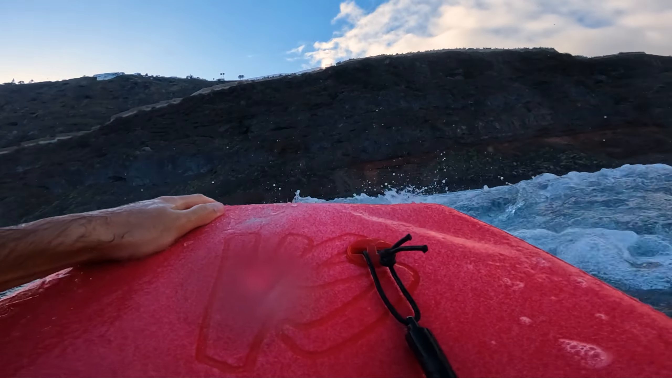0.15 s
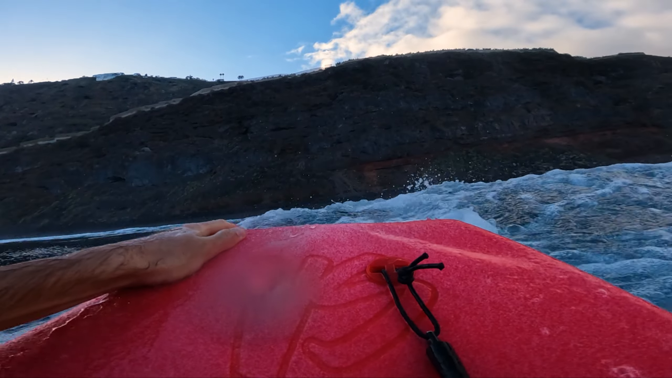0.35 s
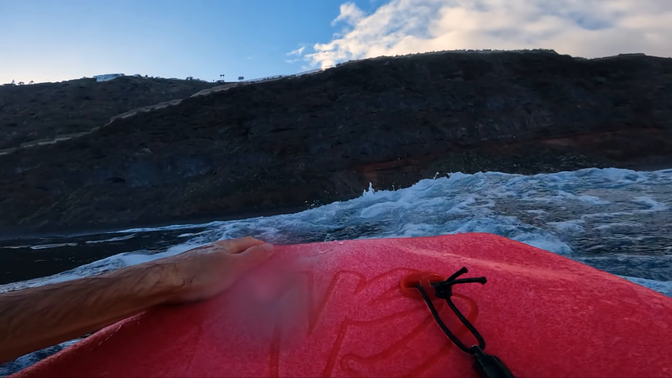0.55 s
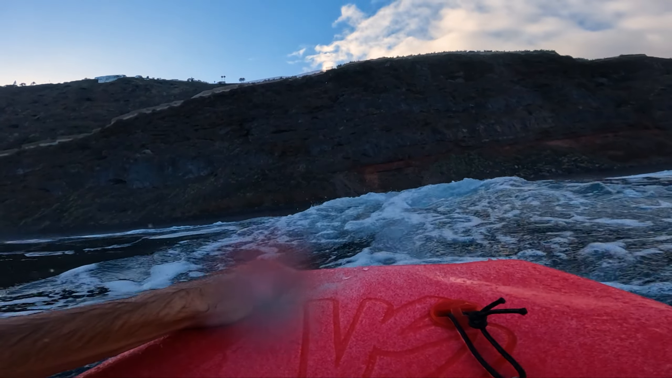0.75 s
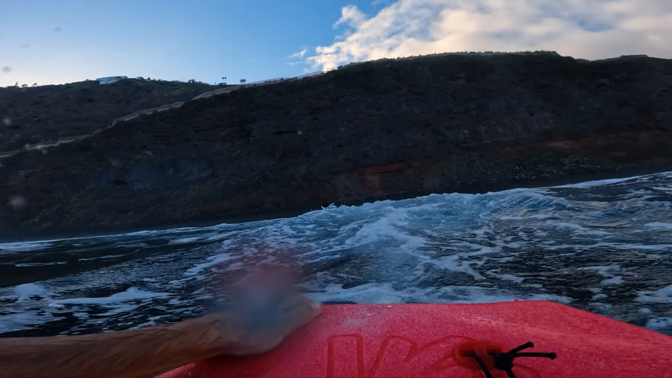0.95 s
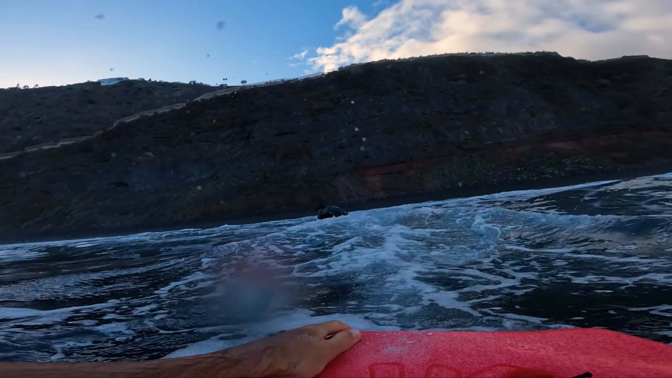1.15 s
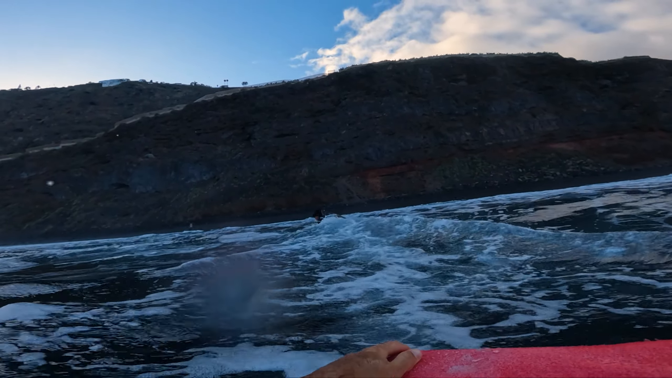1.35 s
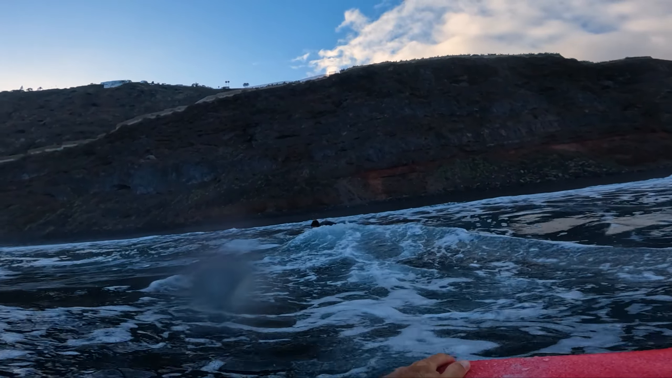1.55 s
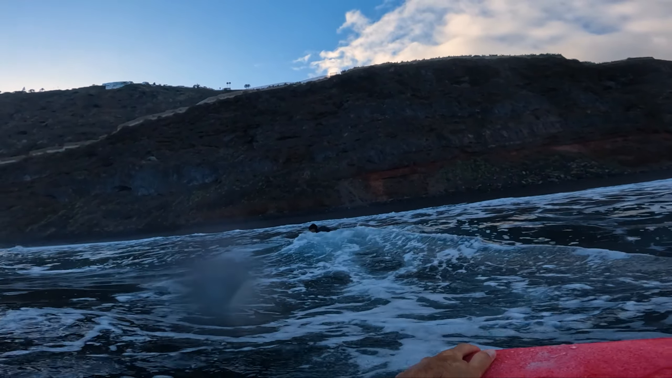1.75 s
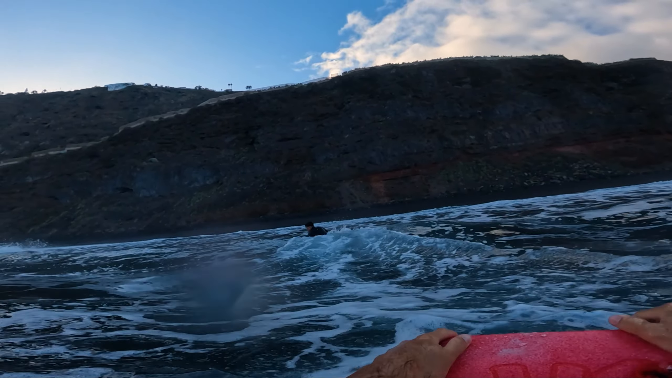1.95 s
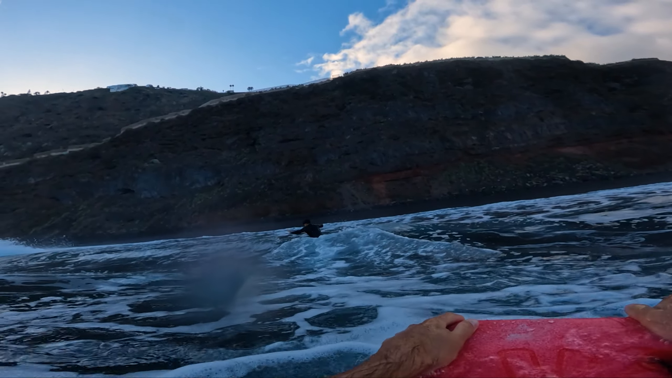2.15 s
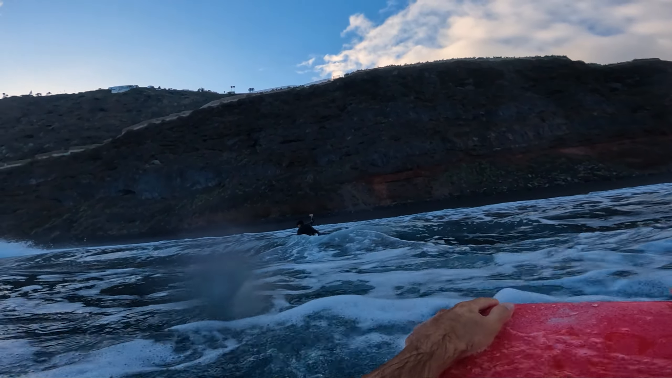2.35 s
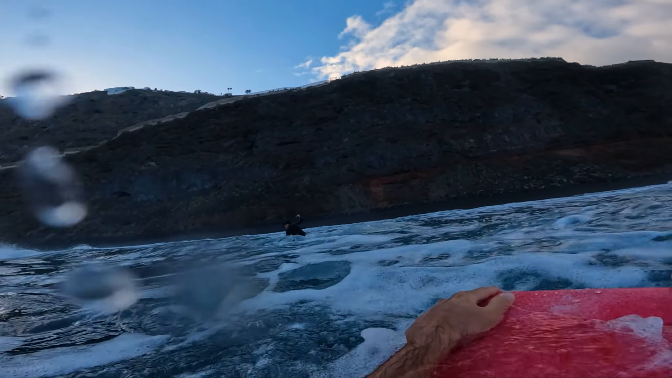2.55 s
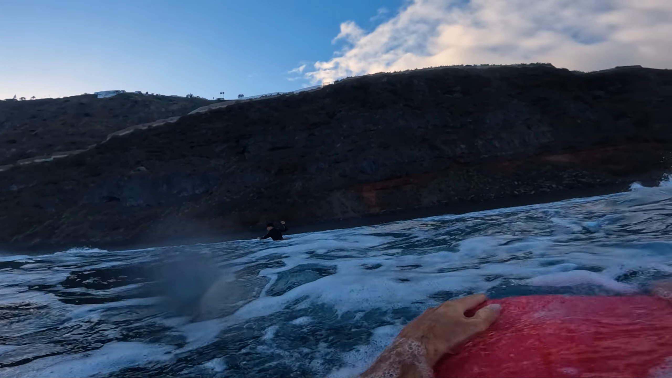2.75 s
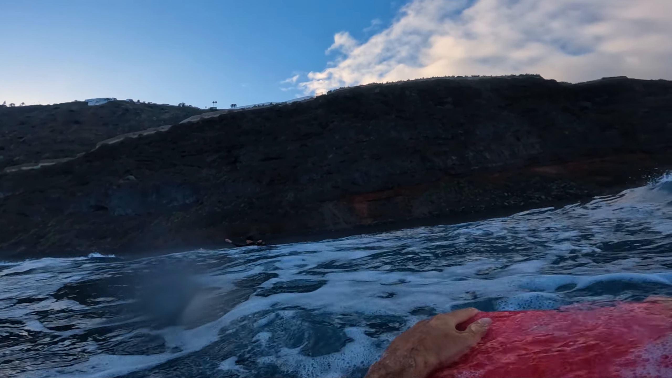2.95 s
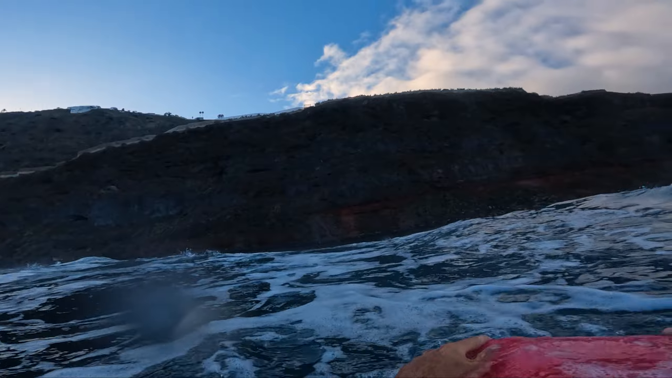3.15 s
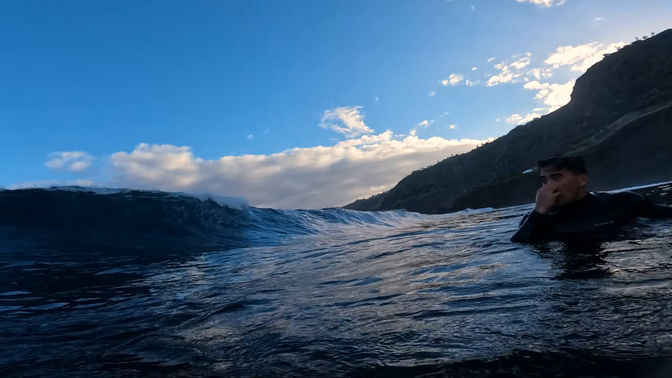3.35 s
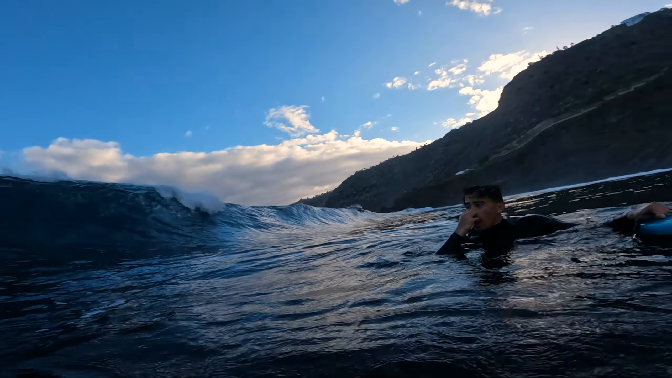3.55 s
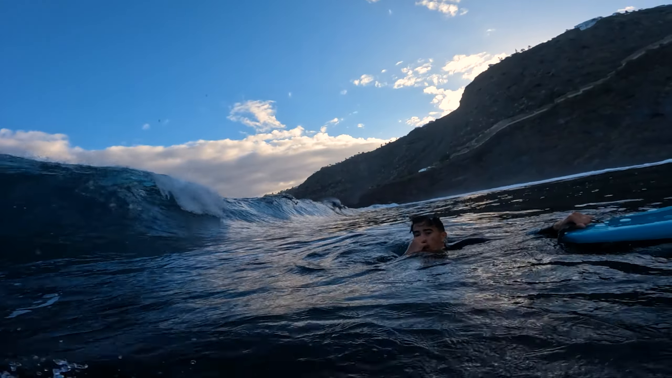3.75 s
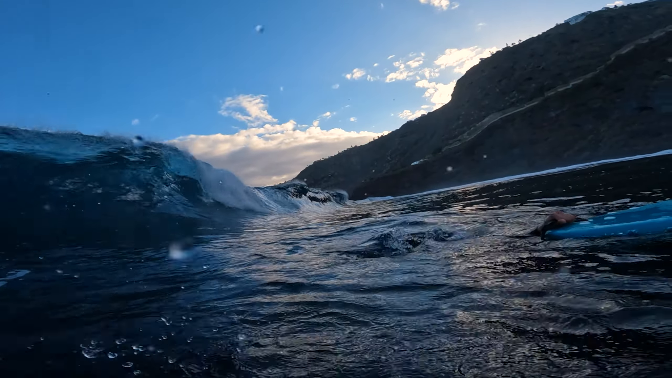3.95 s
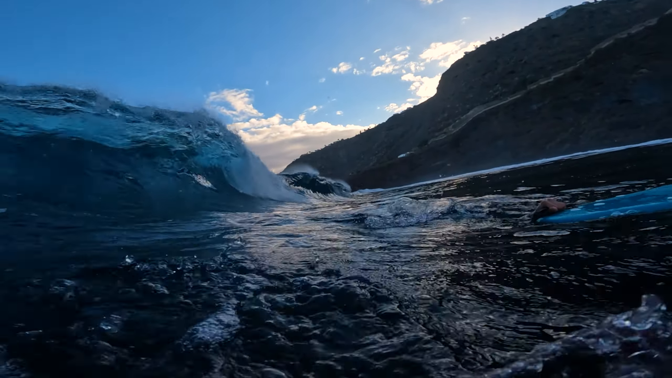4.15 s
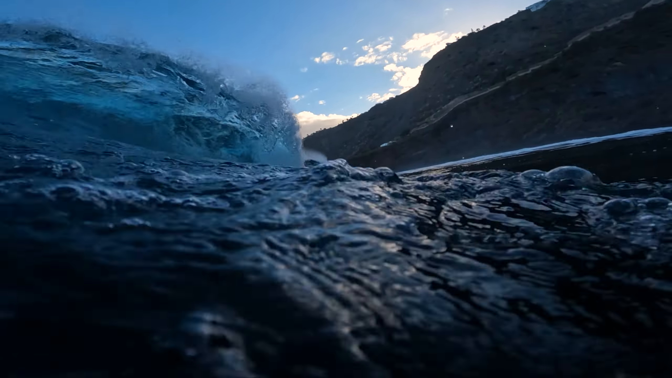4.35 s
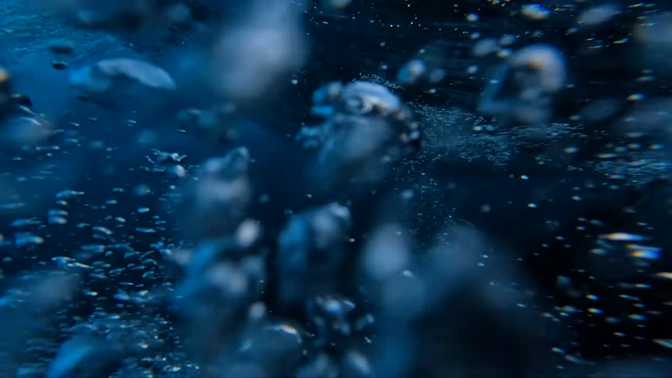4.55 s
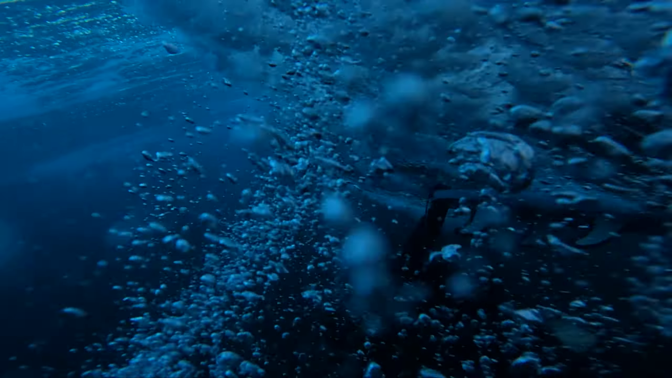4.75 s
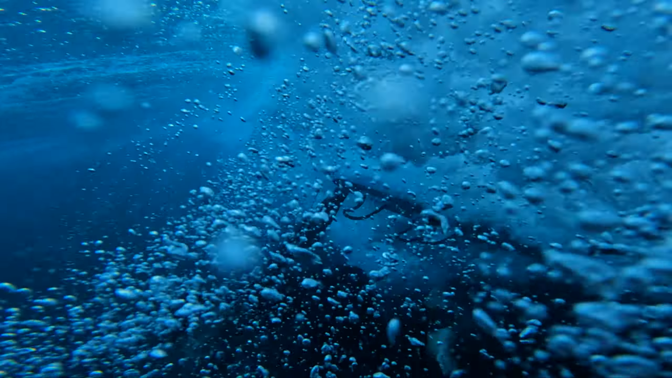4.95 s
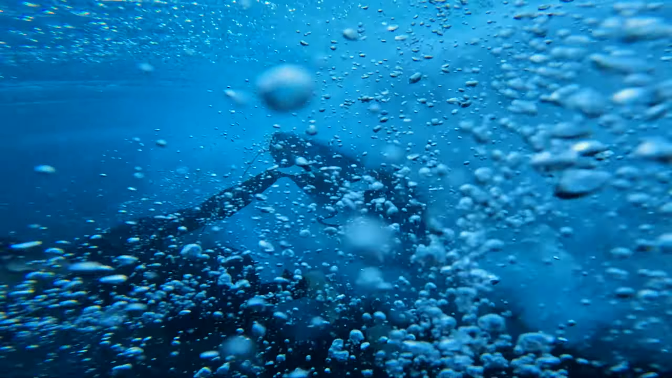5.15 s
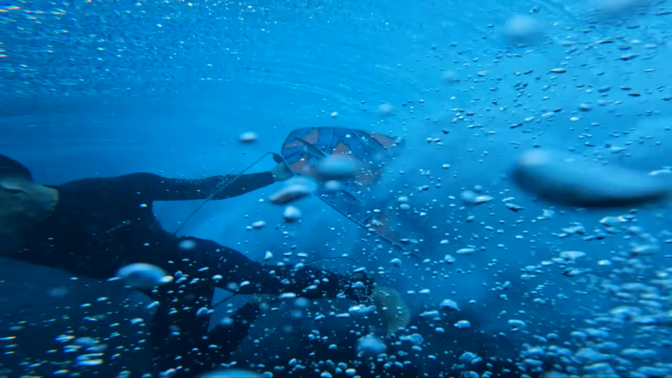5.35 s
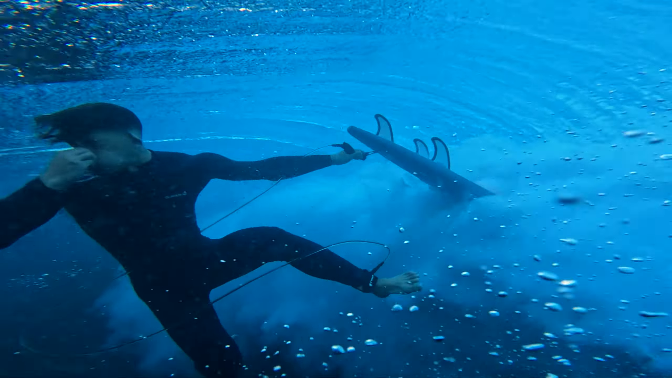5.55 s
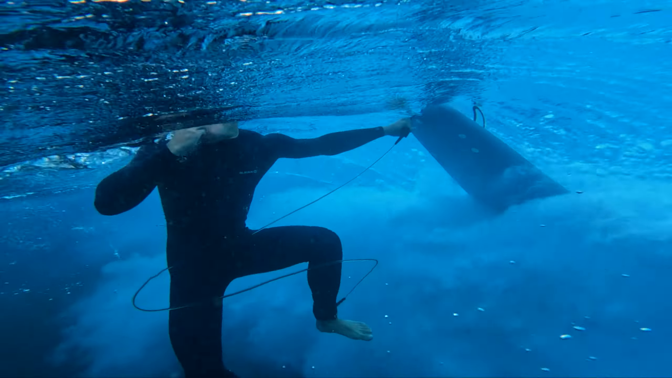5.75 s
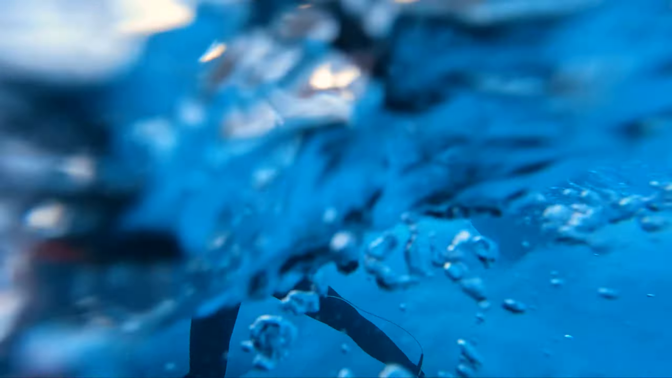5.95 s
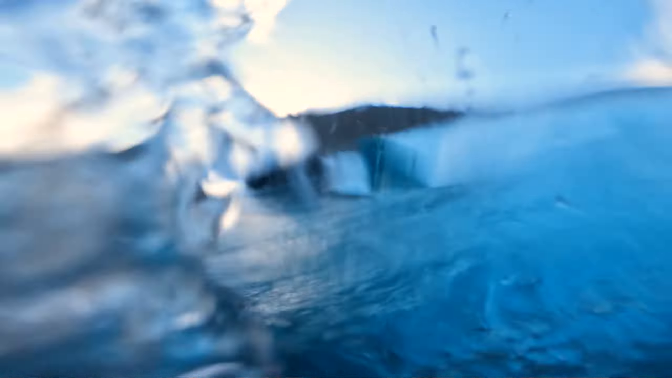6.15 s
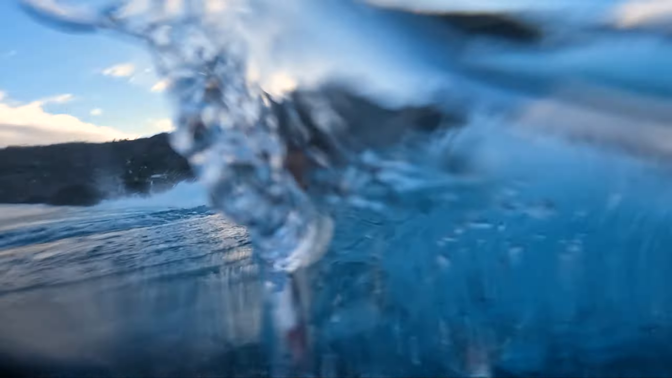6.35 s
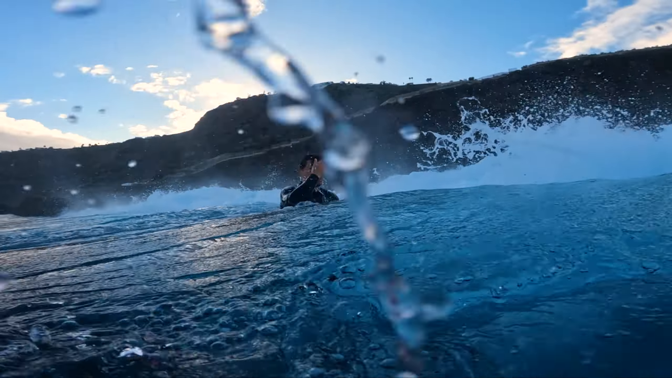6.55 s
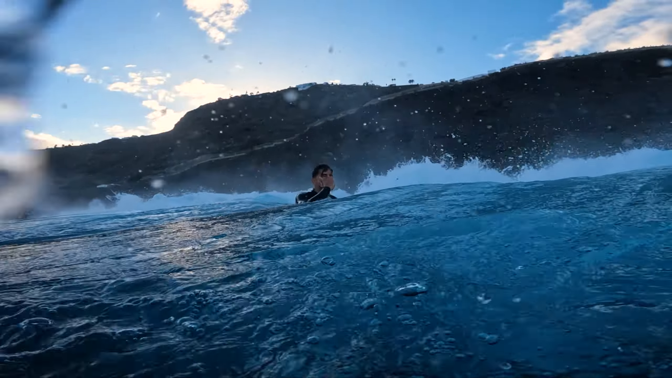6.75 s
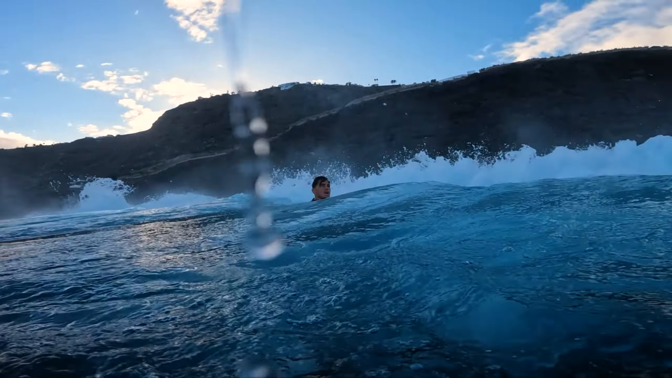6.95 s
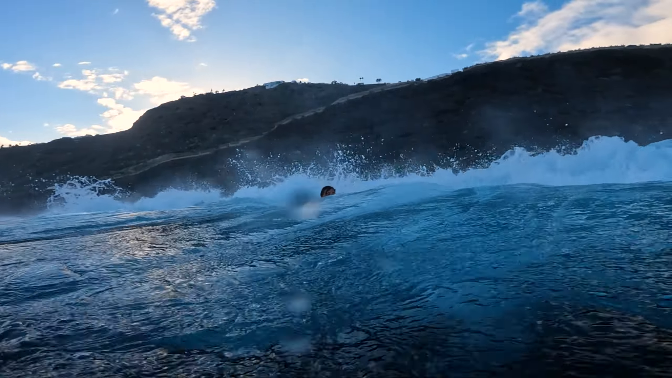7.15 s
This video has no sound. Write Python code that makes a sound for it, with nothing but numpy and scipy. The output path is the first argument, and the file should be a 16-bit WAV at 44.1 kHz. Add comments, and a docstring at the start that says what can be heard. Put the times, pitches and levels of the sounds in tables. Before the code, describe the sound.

Close, water-clogged microphone in the sea: dull rushing, an abrupt join, wet plops, a loud splashing dunk, deep bubbles and gulps, then calmer sloshing.

```python
"""In the surf, on a board: a small camera hears it all close up, its one microphone port filmed with water.
White water rushes past as coloured noise, low and muffled. A hard splice snaps to a second shot:
the foam swells, pops and slaps strike the port, and the camera dips under among bubbles (dying sines)
and gurgles (unsteady gliding tones), with spray as dense tiny rings, then comes up into calmer water."""
import sys
import numpy as np
from scipy import signal
from scipy.io import wavfile
from scipy.ndimage import uniform_filter1d

SR = 44100
rng = np.random.default_rng(int(sys.argv[2]) if len(sys.argv) > 2 else 0)


def output_pcm(signal):
    """Save a mono or channel-first signal as 16-bit PCM at the path in sys.argv[1].

    Samples are clipped to [-1, 1] before scaling.
    """
    pcm = np.clip(np.atleast_2d(signal).T, -1, 1) * 32767
    wavfile.write(sys.argv[1], SR, np.round(pcm).astype(np.int16))


def volts(x):
    """Linear amplitude factor 10**(x/20) for a level x in dB, scalar or array-like."""
    e = np.asarray(x, float) / 20
    return 10 ** e


N = 321930

# Where the camera is. Each row: time in seconds, share under water 0-1, brokenness of the flow 0-1,
# pitch of the wet port as a factor, brightness of the foam as a factor.
PLACE = [(0, 0, 0.14, 1, 1.1), (.8, 0.033, 0.035, 0.99, 1.12), (1.7, .06, 0.12, 0.96, 1.03),
         (2.0, 0.17, 0, 0.95, 1.115), (3.298, 0, 0.04, 1.03, 0.85), (3.338, 0.054, 0.63, 1.15, 0.72),
         (3.601, 0.12, 0.14, 1.08, 1.1), (3.951, .05, 0.25, 1.27, 1.17), (4.458, 0.08, 0, 1.135, 0.88),
         (4.62, 0.33, 0.23, 0.88, 1.3), (4.72, 0.22, 0.84, 1.24, 1.3), (4.801, .1, 0.56, 1.4, 0.79),
         (4.999, 0.34, 0.4, 1.1, 1.2), (5.251, .67, 0.14, 1.04, .95), (5.501, 0.53, 0.089, 1.12, 1.1),
         (5.699, .27, 0.091, 1.03, 1.1), (5.951, 0.48, 0.36, .81, 0.96), (6.051, 0.65, 0.66, 1.17, 1.9),
         (6.171, 0.23, 0.3, 0.93, 1.4), (6.719, 0.21, 0, 0.99, 1.5), (6.919, .075, 0.2, 0.91, 1.15),
         (7.3, 0.099, 0, 1.05, 1.5)]
# Colours at the microphone above water, before blending. Each row: frequency in Hz, density in dB per Hz.
BUFFET_COLOUR = [(8, -18), (25, -2.5), (70, -2), (120, -6), (200, -16.5), (400, -61)]
SLOSH_COLOUR = [(40, -29.5), (90, -1), (140, -2.5), (300, -2), (420, -4.5), (700, -33.5), (1200, -68)]
PORT_COLOUR = [(200, -31), (380, -3), (665, -2.5), (705, -7), (930, -12), (1050, -16.5), (1120, -14.5),
               (1400, -20.5), (2000, -39), (4000, -76)]
FOAM_COLOUR = [(700, -32), (1000, -16), (1250, 1), (1700, -6), (2300, -8), (3300, -12.5), (4500, -19),
               (6500, -24.5), (10000, -73.5), (16000, -81.5)]
# Under water the slosh narrows, the port rings clear of it and the foam dulls.
# Each row: frequency in Hz, density in dB per Hz, before blending.
SLOSH_UNDER = [(40, -39), (100, -25.5), (145, 8.5), (310, -2.5), (400, -23), (600, -35.5), (1200, -69.5)]
PORT_UNDER = [(200, -35.5), (450, -6.5), (620, -1), (800, 8), (950, 0), (1200, -20), (1700, -40.5),
              (4000, -82)]
FOAM_UNDER = [(700, -24.5), (1300, 10), (1800, 3), (2500, -12.5), (4000, -34), (6500, -54), (10000, -70),
              (16000, -87)]
# The three low layers. Each row: time in seconds, buffeting in dB, slosh in dB, ring of the wet port in dB.
FLOW = [(0, -35.5, -29, -35.5), (.32, -26.5, -31.5, -32), (.55, -23.5, -28, -29.5), (1.04, -21.5, -23, -26),
        (1.51, -23, -25, -30), (1.81, -26.5, -21, -22.5), (2.88, -24.5, -19, -30), (3.318, -29, -21, -25.5),
        (3.33, -43, -53, -38.5), (3.355, -42, -36, -34), (3.38, -55, -31, -41), (3.45, -33, -36.5, -44),
        (3.49, -33.5, -41, -33), (3.53, -31, -34, -31.5), (3.65, -37.5, -33, -28.5),
        (3.76, -32.5, -32.5, -32), (3.97, -43.5, -27.5, -33), (4.02, -27.5, -29, -30),
        (4.47, -31, -23.5, -25), (4.51, -22, -25, -41), (4.557, -17.5, -18, -19), (4.65, -24.5, -20, -22),
        (4.81, -23.5, -17.5, -24.5), (5.0, -23.5, -28.5, -35), (5.08, -29, -24.5, -31.5),
        (5.16, -24, -27, -36), (5.27, -26, -23, -41.5), (5.43, -23.5, -20.5, -33),
        (5.46, -24.5, -23.5, -39.5), (5.7, -22.5, -25.5, -27), (5.78, -20.5, -33.5, -27),
        (6.02, -23, -25, -21), (6.07, -15, -28, -32.5), (6.19, -20, -29, -30.5), (6.24, -21, -32, -31),
        (6.32, -23, -27.5, -29), (6.46, -21, -25.5, -26.5), (6.62, -23, -33.5, -26.5),
        (6.655, -28, -27, -25.5), (6.72, -19.5, -24.5, -24.5), (6.83, -20.5, -20.5, -29.5),
        (6.88, -35, -33, -31.5), (7.03, -28.5, -27, -28.5), (7.3, -28, -24, -32)]
# The foam's hiss. Each row: time in seconds, level in dB.
HISS = [(0, -64.5), (.4, -65.5), (.7, -55), (.8, -61.5), (.88, -52), (1.15, -52), (1.25, -51.5),
        (1.36, -53.5), (1.58, -62), (1.68, -53.5), (1.99, -49.5), (2.26, -57.5), (2.82, -50), (3.01, -57.5),
        (3.318, -50), (3.33, -57), (3.47, -57), (3.52, -52.5), (3.88, -63), (4.18, -51), (4.48, -46),
        (4.548, -19), (4.57, -38), (4.96, -64.5), (5.03, -72.5), (5.12, -62), (5.5, -65.5), (5.62, -56.5),
        (5.81, -59.5), (5.84, -44), (5.86, -68), (5.95, -52), (6.01, -45), (6.1, -50), (6.21, -70),
        (6.32, -62.5), (6.52, -63), (6.63, -67.5), (6.7, -57), (6.78, -56.5), (6.85, -65.5), (7.3, -63)]
# Port and foam change level for a moment, mostly dips. Each row: middle in seconds, half length in seconds,
# change in dB.
LULLS = [(4.511, 0.0077, 0.5), (5.871, 0.012, -12.5), (6.233, 0.017, -8.5), (6.309, 0.0084, -7),
         (6.36, 0.014, -7.5), (6.404, 0.022, -7)]
# Air caught at the port sings and glides. Each row: start in seconds, length in seconds, level in dB,
# first pitch in Hz, last pitch in Hz.
GURGLES = [(4.498, 0.0043, -13, 1560, 1630), (4.55, 0.025, -8, 596, 484), (4.628, .055, -8.5, 167, 226.5),
           (4.685, .03, -18, 206.5, 170), (4.566, .035, -10.5, 430, 304), (4.66, 0.026, -8.5, 109, 119),
           (0.556, 0.063, -22, 549, 622), (4.739, 0.026, -54, 4260, 4220), (4.763, 0.035, -22.5, 870, 926),
           (5.941, 0.072, -17.5, 629, 597), (5.945, 0.012, -40, 1880, 1850),
           (5.981, 0.014, -23.5, 633, 684), (6.093, .012, -42, 1850, 1700), (5.609, 0.026, -40, 1036, 1390),
           (3.922, .03, -24, 585, 850), (4.799, .035, -19, 880, 780), (4.835, 0.023, -29.5, 1220, 1233),
           (4.867, 0.015, -17, 822, 730), (5.13, 0.026, -22.5, 632, 662), (5.178, 0.12, -32.5, 730, 860),
           (5.331, 0.069, -19, 295.8, 308.4), (5.441, 0.062, -22.5, 653, 646),
           (5.436, 0.0305, -20.5, 769, 738), (5.945, 0.012, -21.5, 1300, 1230),
           (5.979, 0.024, -12.5, 560, 588), (6.022, 0.011, -6.5, 524, 560), (6.155, .031, -49, 1670, 1935)]
# Water slapping the port. Each row: start in seconds, level at the front in dB,
# time to fall 60 dB in seconds (before limits).
SLAPS = [(0.7484, -50, .026), (0.765, -37.5, 0.041), (0.777, -38.5, 0.033), (1.1347, -37, 0.021),
         (1.2172, -32.5, 0.21), (1.2335, -38, 0.092), (1.262, -42, 0.17), (1.8297, -44, 0.016),
         (3.688, -42, 0.024), (4.496, -16, 0.0074), (4.513, -29.5, 0.027), (4.5219, -23, 0.039),
         (4.5297, -9.5, 0.012), (4.5399, -11.5, 0.025), (4.549, -19.5, 0.013), (4.681, -24, 0.0086),
         (4.709, -31, 0.024), (4.8798, -37, 0.018), (4.912, -45.5, .026), (5.1293, -53, 0.034),
         (5.575, -54, 0.012), (5.639, -48.5, 0.013), (5.732, -38.5, .02), (5.746, -43.5, 0.014),
         (5.7045, -39.5, .015), (5.83, -48, 0.019), (5.9434, -48.5, 0.024), (6.03, -44.5, 0.024),
         (6.075, -32.5, 0.033), (6.31, -46, 0.031), (6.338, -45, 0.027), (6.4455, -47, 0.025),
         (6.651, -47, 0.028)]
# Colour shared by the slaps. Each row: frequency in Hz, relative level in dB.
SLAP_COLOUR = [(500, -33), (1100, 4), (1600, 4), (2500, -6), (3600, -9.5), (4600, -22), (7000, -37.5),
               (12000, -62.5)]
# Single bubbles at the port, low gulps to small plinks. Each row: start in seconds, level in dB,
# starting pitch in Hz.
BUBBLES = [(2.003, -13.5, 613), (4.312, -24, 633), (0.767, -37, 2600), (0.767, -39, 1950),
           (0.778, -10.5, 542), (1.136, -32, 1930), (1.83, -36, 2100), (3.524, -13.5, 485),
           (3.673, -12, 350), (3.65, -18, 606), (3.69, -23, 1174), (3.912, -16, 600), (4.601, -7, 257),
           (4.622, -11.5, 648), (4.674, -8, 359), (4.681, -19, 1250), (4.709, -38, 2480),
           (4.754, -34.5, 2080), (4.777, -6.5, 443), (4.788, -30, 1760), (4.838, -44, 1720),
           (4.884, -26.5, 1253), (4.913, -33, 1840), (4.951, -10.5, 618), (4.956, -33, 1970),
           (4.981, -13, 703), (5.127, -29.5, 1740), (5.127, -47, 2680), (5.165, -45, 2020),
           (5.185, -16, 698), (5.27, -4.5, 146.3), (5.2964, -41.5, 1650), (5.358, -18, 183.7),
           (5.399, -1, 201), (5.541, -7.5, 560), (5.574, -12.5, 596), (5.578, -41, 1800),
           (5.638, -37, 1700), (5.625, -53, 3150), (5.711, -54, 3850), (5.6156, -21, 1185),
           (5.632, -16.5, 1010), (5.645, -14.5, 826), (5.7307, -37, 1350), (5.744, -11.5, 655),
           (5.785, -14, 682), (5.831, -4.5, 189.5), (5.8328, -36.5, 2030), (5.847, -6, 497),
           (5.878, -13, 570), (5.907, -11, 723), (5.944, -6, 571), (6.005, -6.5, 697), (6.025, -38, 2520),
           (6.048, -33, 2190), (6.061, -48, 3500), (6.073, -46, 3290), (6.113, -9, 91), (6.115, -7, 338.4),
           (6.194, 3, 98.3), (6.198, -6, 271), (6.281, 0, 92), (6.282, -4.5, 305), (6.333, -5.5, 479),
           (6.383, 1.5, 109), (6.388, -9.5, 426), (6.4304, -37, 1400), (6.444, -22.5, 1110),
           (6.449, -10.5, 582), (6.511, -11, 545), (6.498, -41.5, 1910), (6.514, -34.5, 1350),
           (6.537, -41, 1610), (6.6538, -40, 1830), (6.737, -12.5, 516), (6.824, -8, 548),
           (6.825, 1, 120.2)]
# A narrow fizz sinks through the foam as the board planes. Each row: time in seconds, level in dB, pitch in Hz.
FIZZ = [(.82, -71, 3290), (0.902, -66, 3350), (0.999, -55.5, 3100), (1.1, -62, 2850), (1.169, -73, 3040)]
# Spray crackling on the housing. Each row: time in seconds, level in dB.
SPRAY = [(1.19, -120), (1.23, -62), (1.36, -62), (1.45, -120), (4.49, -120), (4.535, -43.5), (4.57, -54),
         (4.72, -58.5), (4.8, -120), (5.49, -120), (5.52, -74), (5.66, -76), (5.72, -66), (5.84, -71),
         (5.868, -78.5), (5.96, -67), (6.04, -57.5), (6.11, -60), (6.19, -67), (6.21, -120)]
# The join of the two shots snaps twice. Each row: start in seconds, size of the downward step in dB,
# decay constant in seconds.
SNAPS = [(3.3182, -12, 0.0023), (3.325, -32.5, 0.000077)]
# The water film heaves on the membrane. Each row: time in seconds, level in dB, swing rate in Hz.
HEAVE = [(3.322, -25, 21), (3.398, -19, 12.6), (3.479, -23.5, 11.2), (3.56, -26, 19), (3.66, -31, 15.2),
         (3.71, -19.5, 8.6), (3.745, -19, 15), (3.771, -17.5, 13), (3.815, -18, 17), (3.84, -17, 10),
         (4.0, -21.5, 12), (4.07, -48, 13)]
# The film over the port bursts, a dry pop. Each row: start in seconds, gain in dB, pitch as a factor.
POPS = [(4.4945, -20, 1.25), (6.114, -28.5, .98), (6.138, -25.5, .98), (6.1565, -25.5, 0.99)]
# What a pop rings with at pitch factor 1. Each row: frequency in Hz, level in dB, time to fall 60 dB in seconds.
POP_MODES = [(1350, 11.5, 0.0059), (3300, -4, 0.0056)]
# Tiny bright ticks, some of them the crackle of an overloaded microphone.
# Each row: start in seconds, level in dB, pitch in Hz.
TICKS = [(4.499, -23, 4140), (4.5329, -17, 4110), (4.5504, -31, 4350), (4.581, -44, 3200),
         (4.593, -39, 3420), (4.624, -41, 3150), (4.649, -47, 3470), (4.659, -39, 3490), (4.666, -42, 3180),
         (4.684, -42, 3400), (4.713, -40, 3500), (4.721, -40.5, 3450), (4.738, -47, 4200),
         (4.835, -44.5, 4200), (4.880, -46.5, 4160), (4.915, -50, 2790), (5.6721, -47, 3620),
         (5.678, -52, 3600), (5.6828, -54, 3600), (5.7045, -44.5, 3240), (5.741, -52, 3510),
         (5.799, -54, 3430), (5.825, -50.5, 3300), (5.884, -53.5, 2940), (6.007, -46, 4140),
         (6.105, -45, 4180), (6.199, -50, 2600), (6.826, -50, 2990)]

SWARM_FROM = 0.2  # share under water at which random bubbles begin
RING_S, RING_SLOPE = 0.029, 0.19  # 60 dB fall of a 1 kHz bubble; lower ones ring longer
CLIMB = 0.032  # share of extra phase at the end of a ring; the pitch climbs by twice this
SWELL_S, SWELL_CYCLES = 0.0008, 0.6  # a bubble swells over whichever is longer
GURGLE_EDGE_S, GURGLE_SAG_DB = 0.0011, -6  # shortest edge; level change from start to end
WOBBLE_S, WOBBLE_DB, WOBBLE_SHARE = 0.0038, 3.5, 0.038  # smoothing, level and pitch wander of long gurgles
SPRAY_HZ, SPRAY_PER_S = (1800, 4700), 2500
SPRAY_CYCLES, SPRAY_SLOPE = 32, 1.3  # cycles to fall 60 dB; how steeply higher droplets weaken
TICK_CYCLES = 0.81  # time to the top of a tick's envelope, in cycles of its pitch
FLOOR_DB = -118  # microphone noise


def evened(x):
    """Scales to rms 1."""
    return x / np.sqrt(np.mean(x ** 2) + 1e-20)


def add(mix, s, sound):
    """Mixes a sound in at time s."""
    part = mix[round(s * SR):][:len(sound)]
    part += sound[:len(part)]


def smooth(x, width):
    """Two moving averages in a row, along the last axis."""
    return uniform_filter1d(uniform_filter1d(x, size=width), size=width)


def control(rows, column):
    """One column of a table, sample by sample, corners rounded over 2 ms."""
    rows = np.asarray(rows)
    line = np.interp(np.arange(N) / SR, rows[:, 0], rows[:, column])
    return smooth(line, 44)


def colour(points, hz):
    """Level in dB at the given frequencies, interpolated along log frequency."""
    f, db = np.transpose(points)
    return np.interp(np.log(hz + 1), np.log(f + 1), db)


def churn():
    """How broken the flow is, 0-1."""
    return np.clip(control(PLACE, column=2), 0, 1)


def rush(above, below, size, patch_db, lump_db, lump_s, slide=None):
    """Noise whose colour blends with depth; drifting patches, and lumps that deepen with churn."""
    hop = size // 4
    a, b, patches = rng.standard_normal((N // hop + 5, size // 2 + 1, 3)).T
    patches = uniform_filter1d(uniform_filter1d(patches, size=6, axis=0), size=6, axis=1)
    patches = evened(patches)
    place = np.transpose(PLACE)
    t = np.arange(a.shape[1]) * hop / SR
    under = np.clip(np.interp(t, place[0], place[1]), 0, 1)
    shift = 1 if slide is None else np.interp(t, place[0], slide)  # slides the colour up or down
    hz = np.fft.rfftfreq(size, 1 / SR)[:, None] / shift
    # the weights sum to 1.5, which steepens the colours
    shape = volts((1.5 - under) * colour(above, hz) + under * colour(below, hz))
    shape = shape / np.linalg.norm(shape, axis=0)
    spectrum = (a + 1j * b) * shape * volts(patch_db * patches)
    noise = evened(signal.istft(spectrum, nperseg=size, noverlap=size - hop)[1][:N])

    pole = np.exp(-1 / (lump_s * SR))
    lumps = evened(signal.lfilter([1], [1, -2 * pole, pole ** 2], rng.standard_normal(N)))
    depth_db = lump_db * churn()
    mean_db = depth_db ** 2 * np.log(10) / 20  # holds the power roughly steady at any depth
    return noise * volts(depth_db * np.clip(lumps, -1.5, 2.5) - mean_db)


def buffet():
    """Flow pushing on the membrane: a deep rumble of noise."""
    return rush(BUFFET_COLOUR, BUFFET_COLOUR, size=4096, patch_db=2.0, lump_db=3.5, lump_s=0.013)


def slosh():
    """Water moving about the camera: low noise in a band that narrows under water."""
    return rush(SLOSH_COLOUR, SLOSH_UNDER, size=2048, patch_db=0.0, lump_db=3.0, lump_s=0.0079)


def port():
    """The wet port's ring: noise in a sliding band, with a swarm of larger bubbles."""
    pitch = np.transpose(PLACE)[3]
    noise = rush(PORT_COLOUR, PORT_UNDER, size=1024, patch_db=1.06, lump_db=9.0, lump_s=0.013, slide=pitch)
    return noise + volts(-11.0) * swarm(523, 950, per_s=250, cycles=50, spread_db=-1.0)


def foam():
    """Hissing foam: bright, fine-grained noise, with a swarm of smaller bubbles."""
    bright = np.transpose(PLACE)[4]
    noise = rush(FOAM_COLOUR, FOAM_UNDER, size=256, patch_db=2.0, lump_db=8.0, lump_s=0.0016, slide=bright)
    return noise + volts(-5.0) * swarm(1100, 2400, per_s=400, cycles=47, spread_db=1.5)


def lulls():
    """Gain of the port and foam: smooth, brief level changes."""
    t = np.arange(N) / SR
    return volts(sum(db * np.exp(-((t - s) / half) ** 2) for s, half, db in LULLS))


def water():
    """The flow close to the microphone: four noise layers, each following its own level."""
    dips = lulls()
    out = volts(control(FLOW, column=1)) * buffet()
    out += volts(control(FLOW, column=2)) * slosh()
    out += volts(control(FLOW, column=3)) * dips * port()
    return out + volts(control(HISS, column=1)) * dips * foam()


def gurgles():
    """Caught air as held, unsteady sines that glide between quick edges."""
    out, width = np.zeros(N), round(WOBBLE_S * SR)
    wander = evened(smooth(rng.standard_normal((len(GURGLES), 2, 6000)), width))
    for (s, length, db, first_hz, last_hz), (louder, higher) in zip(GURGLES, wander):
        t = np.arange(0, length, 1 / SR)
        edge = max(GURGLE_EDGE_S, 0.18 * length)
        loose = min(length / 0.074, 1)  # brief ones have no time to wander
        shape = np.sin(np.pi / 2 * np.clip(np.minimum(t, length - t) / edge, 0, 1)) ** 2
        glide_hz = first_hz + (last_hz - first_hz) * t / length
        hz = glide_hz * (1 + loose * WOBBLE_SHARE * higher[:len(t)])
        level_db = db + GURGLE_SAG_DB * t / length + loose * WOBBLE_DB * louder[:len(t)]
        add(out, s, shape * volts(level_db) * np.sin(2 * np.pi * np.cumsum(hz) / SR))
    return out


def slaps():
    """Bursts of noise with an abrupt front that die away, all through one colour."""
    out, t = np.zeros(N), np.arange(6000) / SR
    noise = rng.standard_normal((len(SLAPS), len(t)))
    front = 1 - np.exp(-t / 0.00043)
    for (s, db, t60), burst in zip(SLAPS, noise):
        fall = volts(db - 60 * t / np.clip(t60, 0.004, 0.14))
        add(out, s, fall * front * burst)
    hz = np.linspace(0, SR / 2, 257)
    shape = signal.firwin2(255, hz, volts(colour(SLAP_COLOUR, hz)), fs=SR)
    return signal.oaconvolve(out, shape / np.linalg.norm(shape), "same")


def ring(hz, t60, rise, start_cycles):
    """A bubble: a dying sine that starts softly and climbs in pitch."""
    t60 = np.clip(t60, 0.004, 0.3)
    t = np.arange(round(t60 * SR)) / SR
    onset = 1 - np.exp(-(t * hz / start_cycles) ** 2)
    return onset * volts(-60 * t / t60) * np.sin(2 * np.pi * hz * t * (1 + rise * t / t60))


def bubbles():
    """Single bubbles at the port, each a climbing ring whose length depends on its pitch."""
    out = np.zeros(N)
    for s, db, hz in BUBBLES:
        t60 = RING_S * (hz / 1000) ** -RING_SLOPE
        add(out, s, volts(db) * ring(hz, t60, CLIMB, max(SWELL_CYCLES, SWELL_S * hz)))
    return out


def fizz():
    """Narrow noise: slow random swings carried up to one sliding pitch."""
    s, db, hz = np.transpose(FIZZ)
    t = np.arange(s[0], s[-1], 1 / SR)
    slow = smooth(rng.standard_normal((2, len(t))), 36)
    turn = np.exp(2j * np.pi * np.cumsum(np.interp(t, s, hz)) / SR)
    narrow = evened((turn * (slow[0] + 1j * slow[1])).real)
    return s[0], volts(np.interp(t, s, db)) * narrow


def spray(count=20):
    """Droplets on the housing: dense, random short rings, the high ones faint."""
    out = np.zeros(N)
    for hz in np.geomspace(*SPRAY_HZ, count):
        chance, size = rng.random(N), np.minimum(rng.exponential(1, N), 3)
        starts = (chance < SPRAY_PER_S / count / SR) * volts(3.5 * size)
        droplet = ring(hz, SPRAY_CYCLES / hz, 0.05, 0.75) * (SPRAY_HZ[0] / hz) ** SPRAY_SLOPE
        out += signal.oaconvolve(starts, droplet)[:N]
    return volts(control(SPRAY, column=1)) * evened(out)


def snaps():
    """The splice: abrupt downward steps that decay back to zero."""
    out = np.zeros(N)
    for s, db, fall in SNAPS:
        add(out, s, -volts(db) * np.exp(-np.arange(800) / SR / fall))
    return out


def heave():
    """A slow, flat-topped swing, mostly below hearing, that shakes the membrane."""
    s, db, hz = np.transpose(HEAVE)
    t = np.arange(s[0], s[-1], 1 / SR)
    phase = -2 * np.pi * np.cumsum(np.interp(t, s, hz)) / SR
    swing = np.tanh(2.8 * np.sin(phase))
    return s[0], volts(np.interp(t, s, db)) * evened(swing)


def pops():
    """The bursting film: each pop is one soft blow on two damped modes."""
    out, t = np.zeros(N), np.arange(500) / SR
    modes = sum(volts(db - 60 * t / t60) * np.sin(2 * np.pi * hz * t) for hz, db, t60 in POP_MODES)
    pop = modes * (1 - np.exp(-(t / 0.0006) ** 2))
    for s, db, higher in POPS:
        add(out, s, volts(db) * np.interp(t * higher, t, pop, right=0))
    return out


def ticks():
    """Ticks: very short sine pulses that swell and die within a few cycles."""
    out, t = np.zeros(N), np.arange(100) / SR
    for s, db, hz in TICKS:
        u = t * hz / TICK_CYCLES
        add(out, s, volts(db) * np.sin(2 * np.pi * hz * t) * u ** 2 * np.exp(2 - 2 * u))
    return out


def swarm(low_hz, high_hz, per_s, cycles, spread_db, count=24):
    """Random rings crowding the port under water; small, high bubbles are faint."""
    # the rate is per_s times the share under water beyond SWARM_FROM
    density = per_s / count / SR * np.clip(control(PLACE, column=1) - SWARM_FROM, 0, 1)
    out = np.zeros(N)
    for hz in np.geomspace(low_hz, high_hz, count):
        chance, size = rng.random(N), np.minimum(rng.exponential(1, N), 3)
        starts = (chance < density) * volts(spread_db * size)
        bubble = ring(hz, cycles / hz, 0.068, 2.0) * (low_hz / hz) ** 1.62
        out += signal.oaconvolve(starts, bubble)[:N]
    return evened(out)


def scene():
    """All the sounds at one microphone, eased in and out over 5 ms."""
    mix = water() + bubbles() + ticks() + gurgles() + slaps() + pops() + spray()
    add(mix, *heave())
    add(mix, *fizz())
    return mix[None] * signal.windows.tukey(N, 0.01 * SR / N)


def roll_off(x):
    """The treble ends steeply here."""
    return signal.sosfilt(signal.butter(12, 15300, fs=SR, output="sos"), x)


def record(dry):
    """The microphone's soft knee and very faint noise, then the snaps of the splice."""
    bent = 1.393 * np.tanh(dry / 1.124)
    noise = volts(FLOOR_DB) * rng.standard_normal(dry.shape)
    return roll_off(bent + noise + snaps())


dry = scene()
out = record(dry)
output_pcm(out)
```